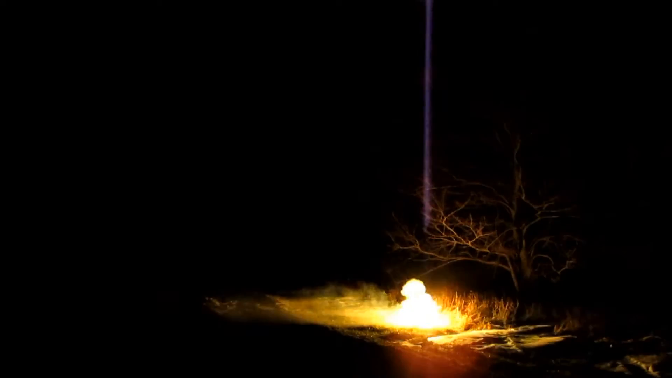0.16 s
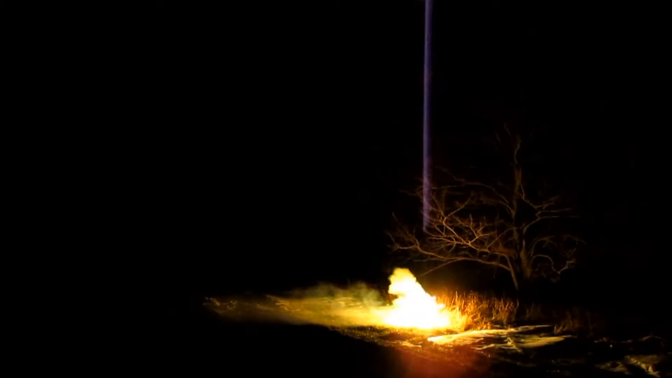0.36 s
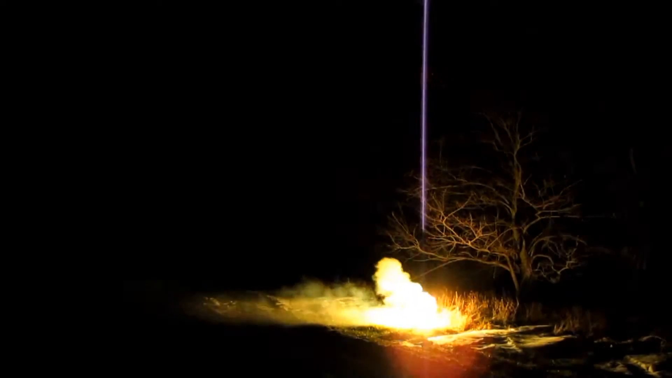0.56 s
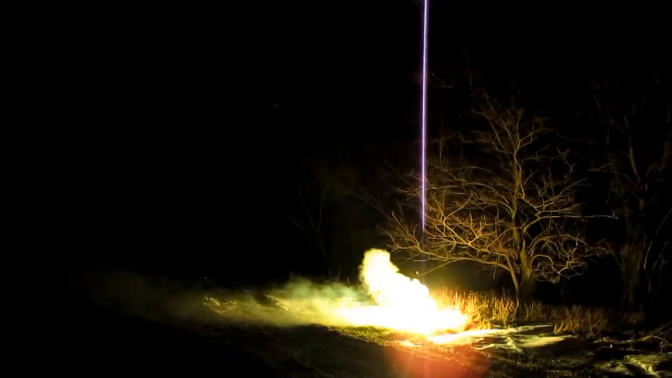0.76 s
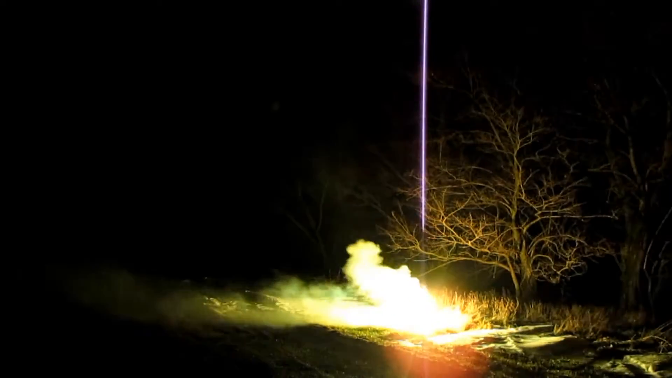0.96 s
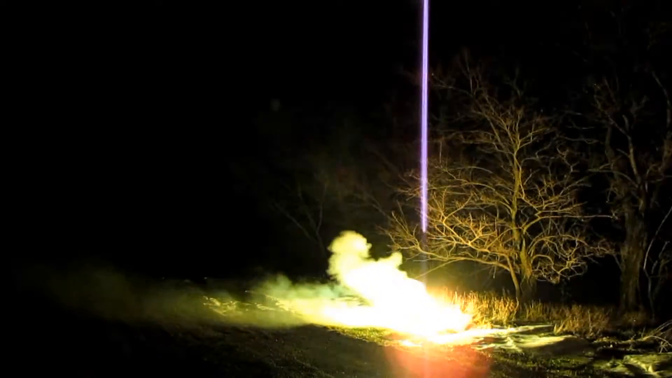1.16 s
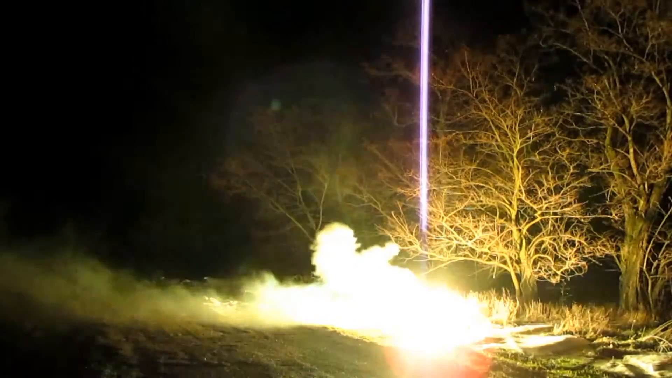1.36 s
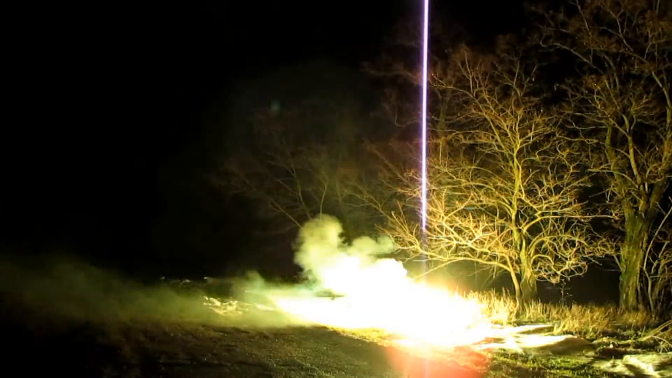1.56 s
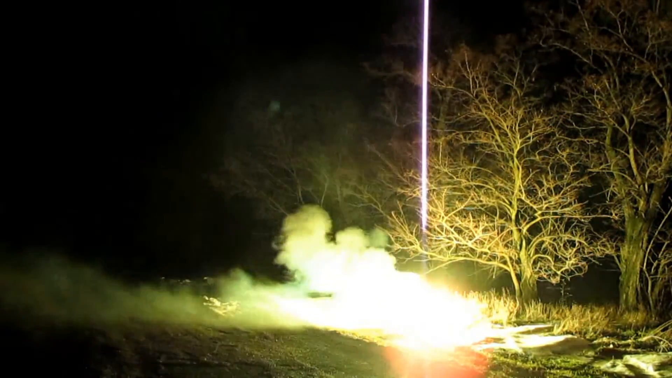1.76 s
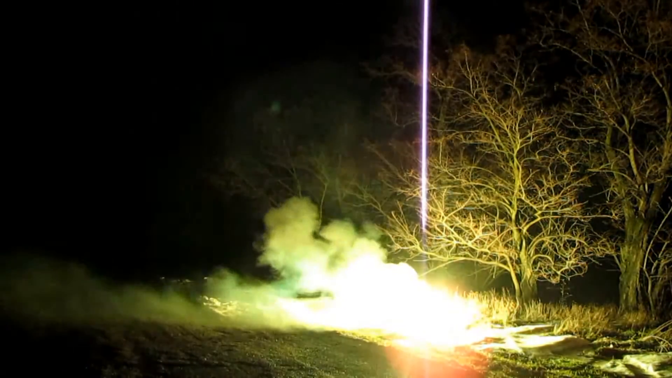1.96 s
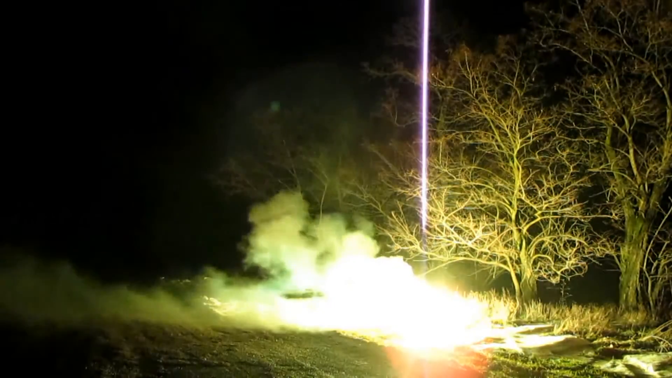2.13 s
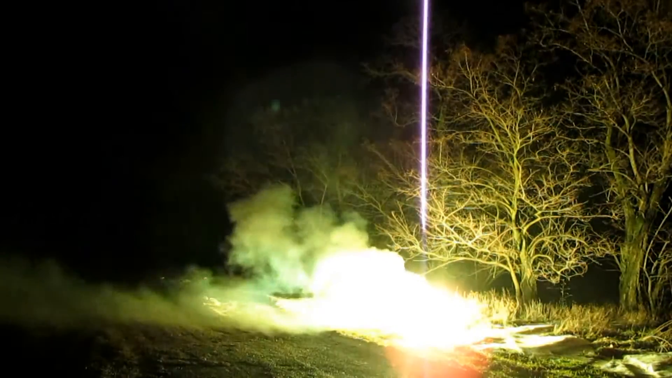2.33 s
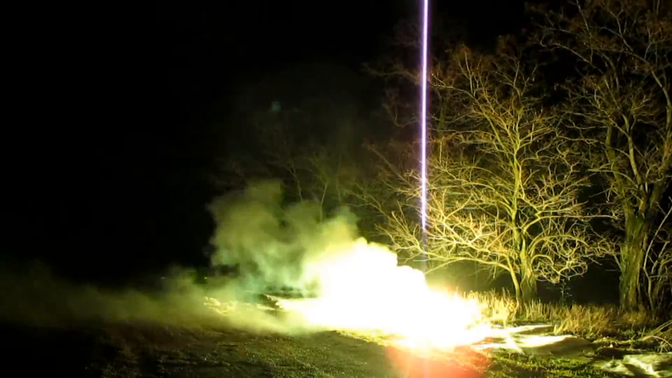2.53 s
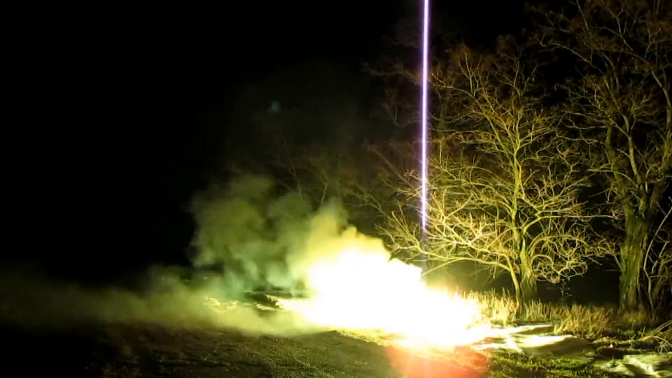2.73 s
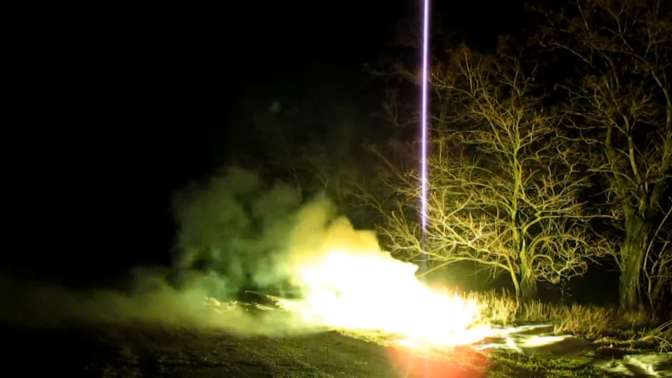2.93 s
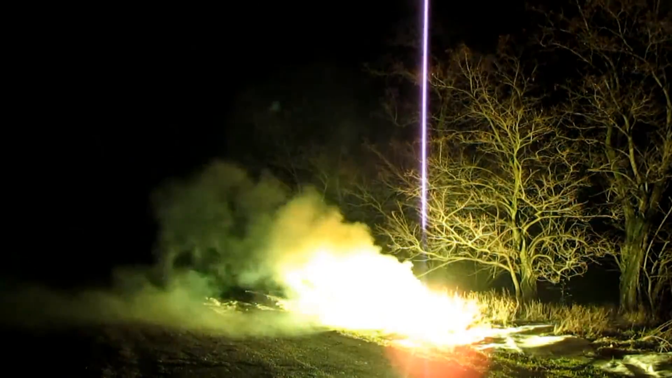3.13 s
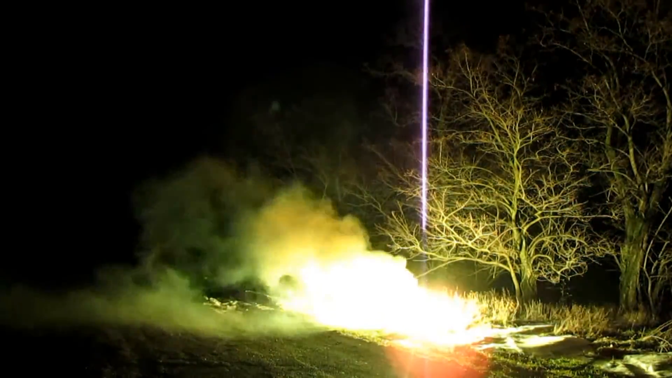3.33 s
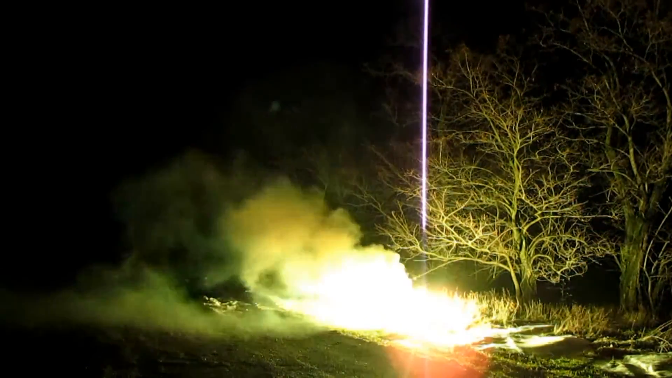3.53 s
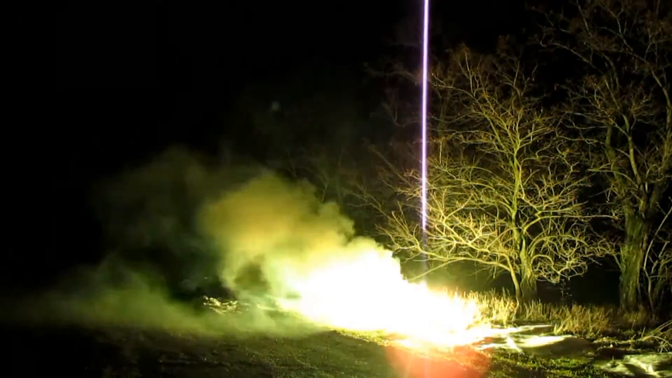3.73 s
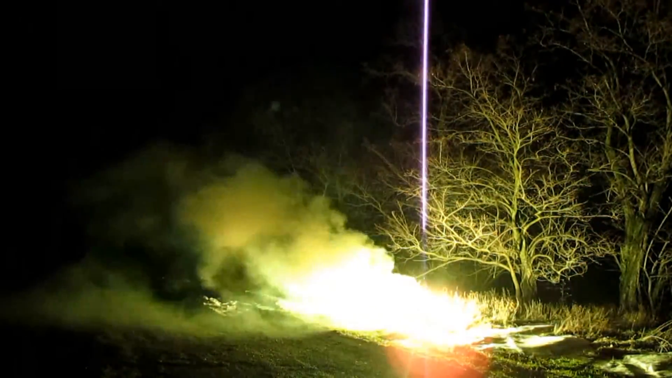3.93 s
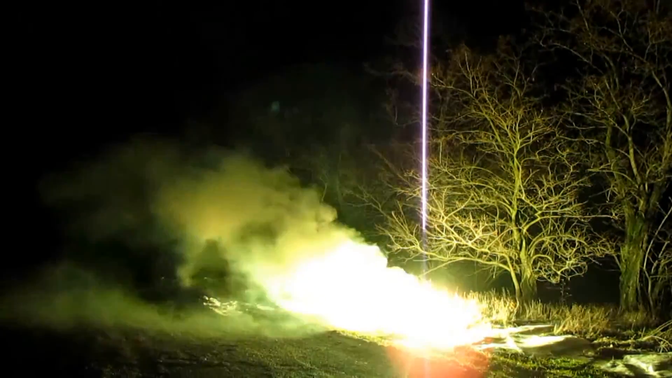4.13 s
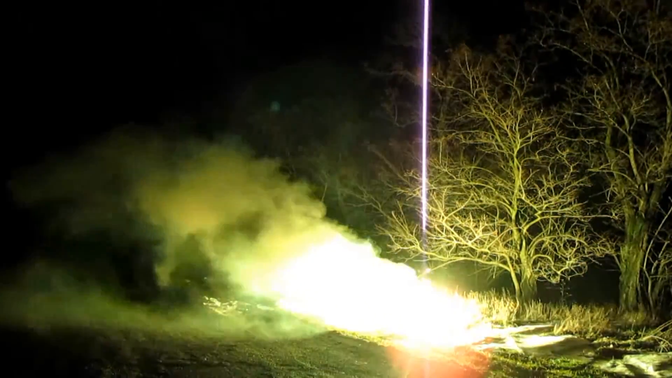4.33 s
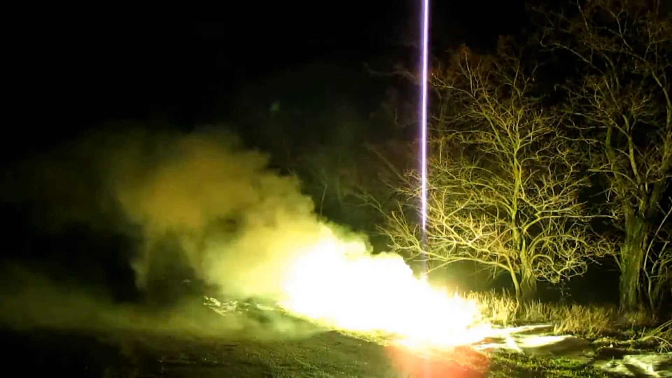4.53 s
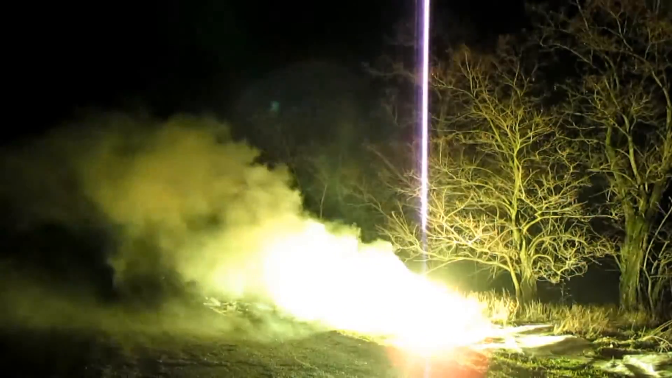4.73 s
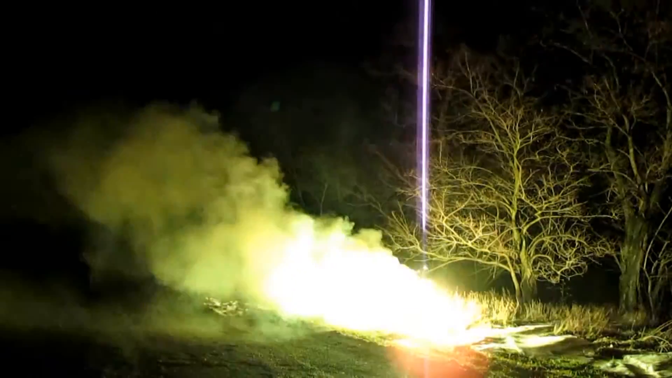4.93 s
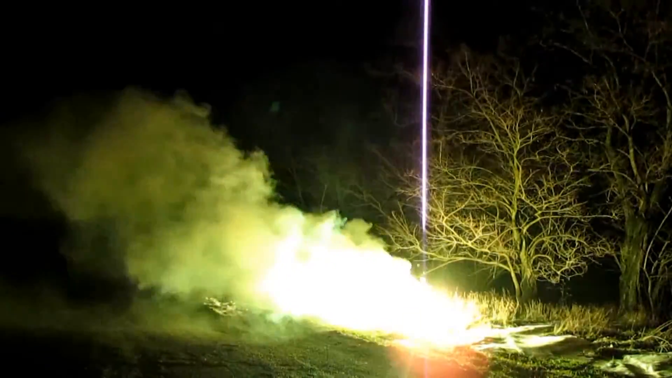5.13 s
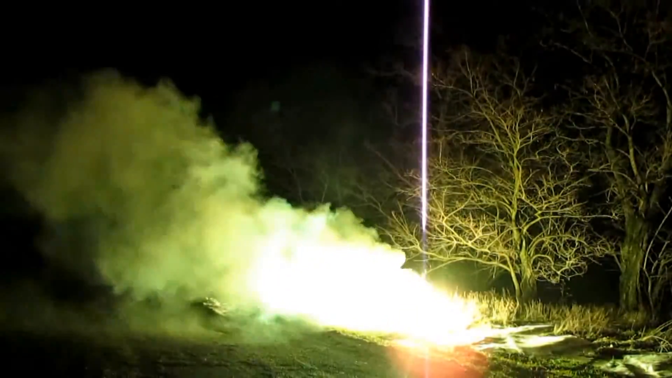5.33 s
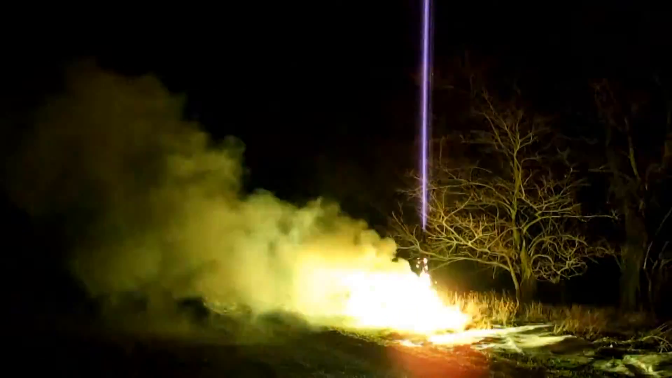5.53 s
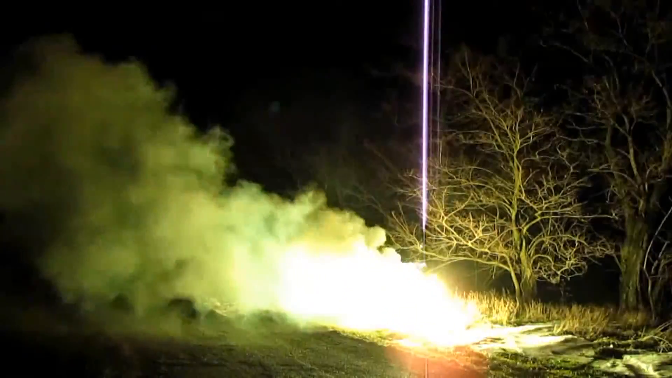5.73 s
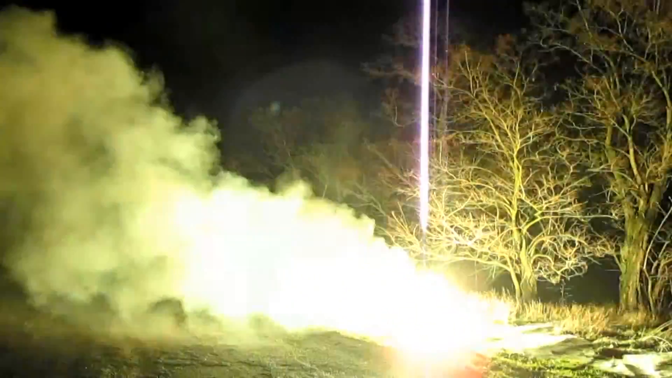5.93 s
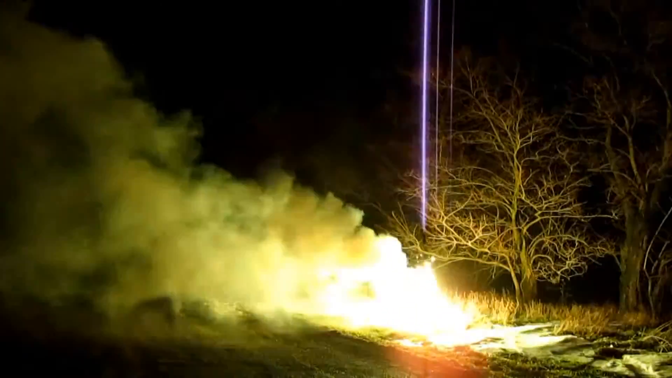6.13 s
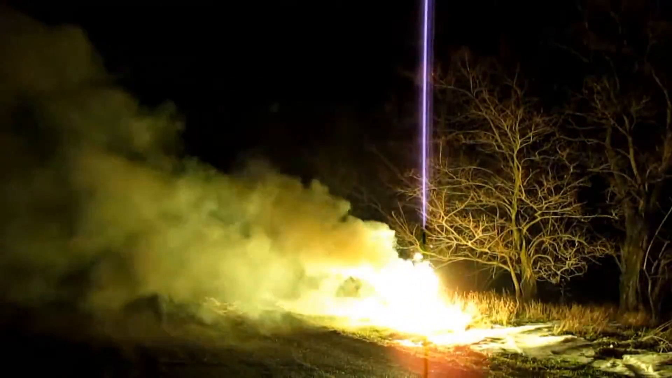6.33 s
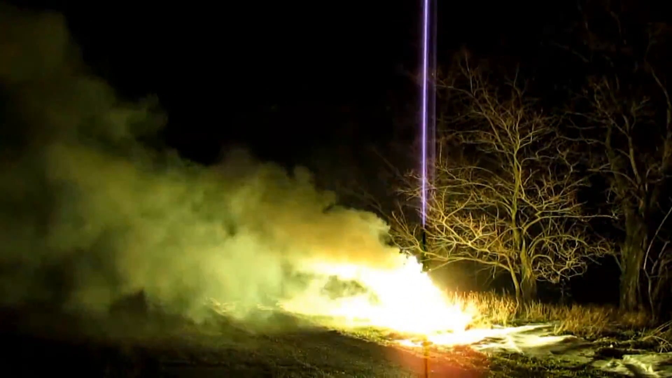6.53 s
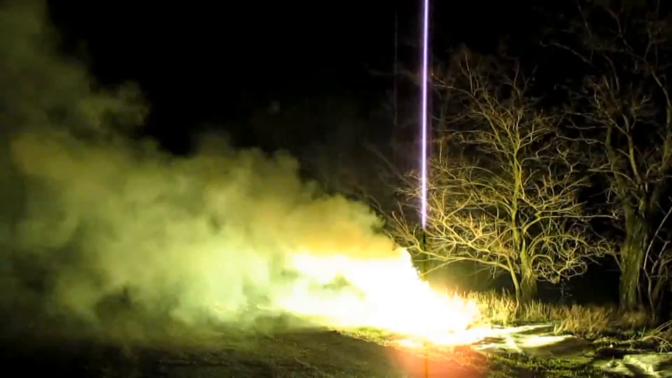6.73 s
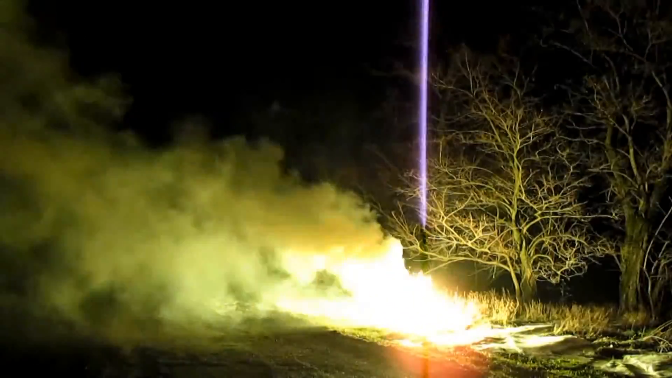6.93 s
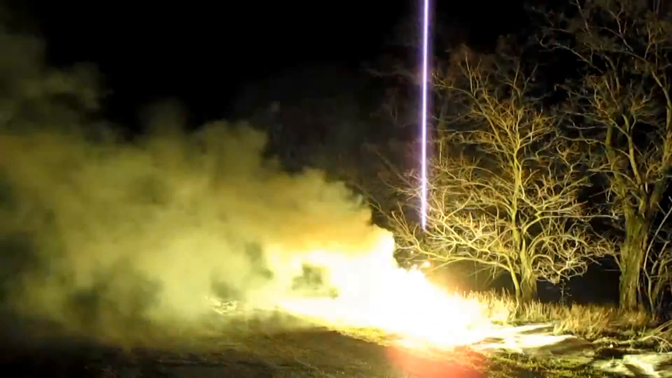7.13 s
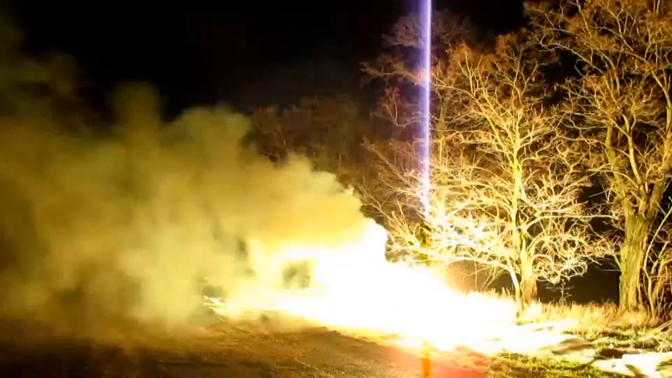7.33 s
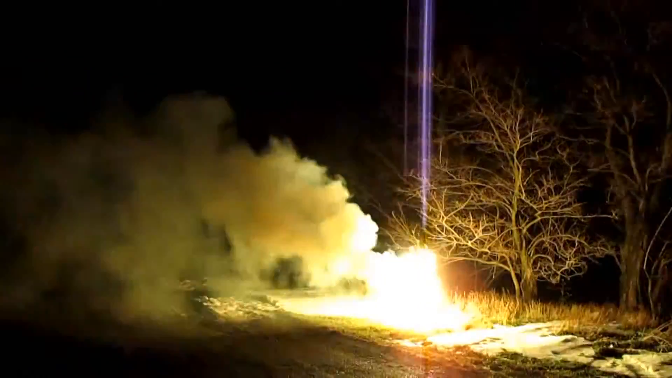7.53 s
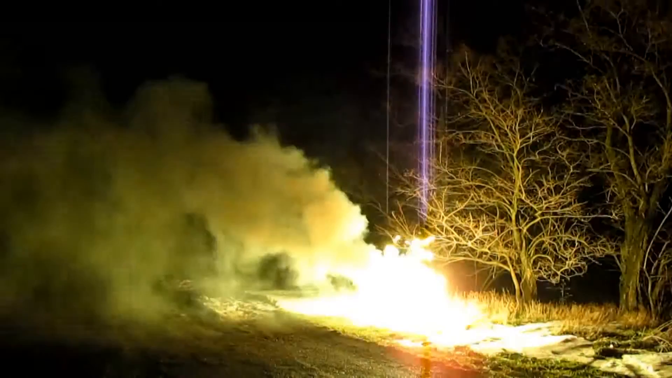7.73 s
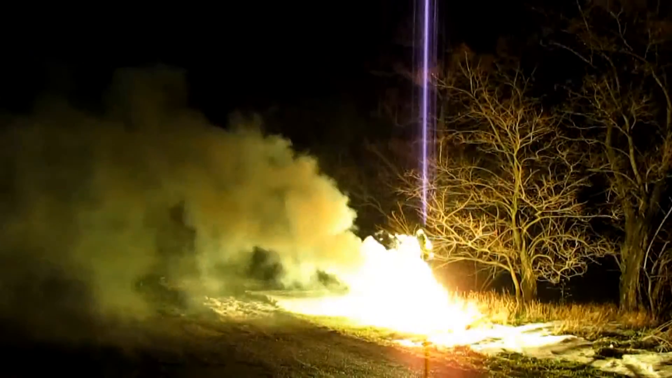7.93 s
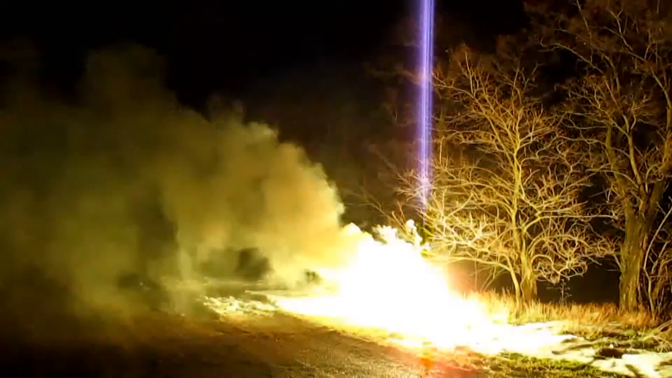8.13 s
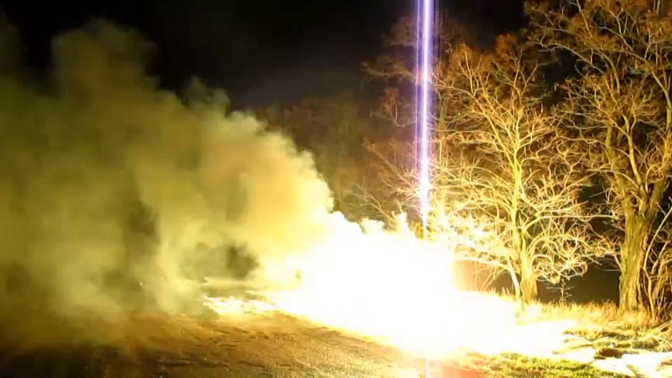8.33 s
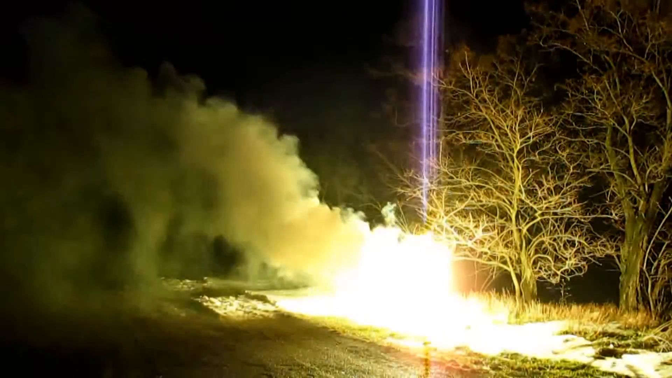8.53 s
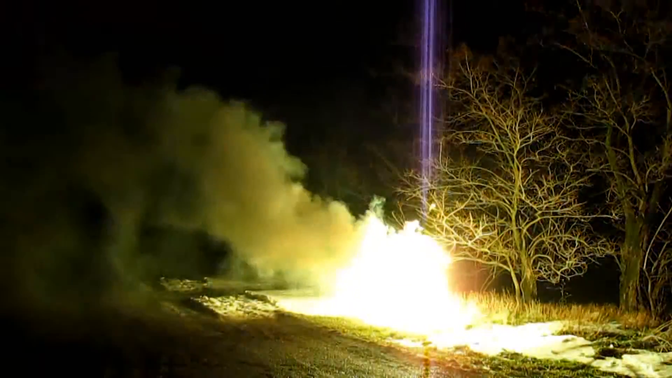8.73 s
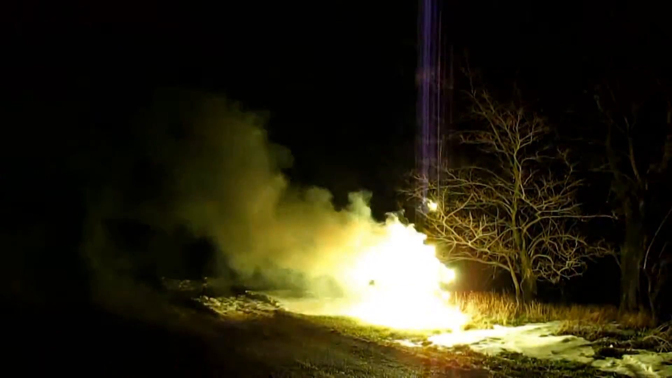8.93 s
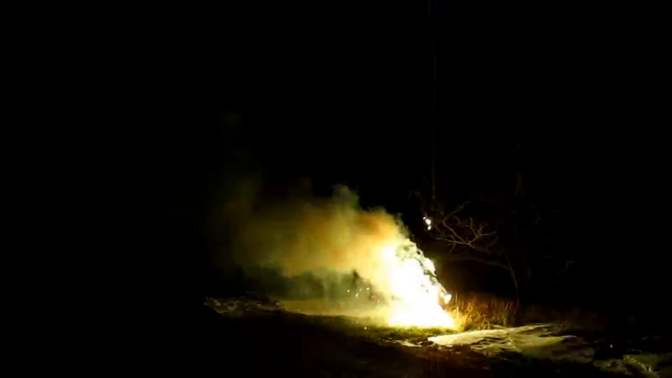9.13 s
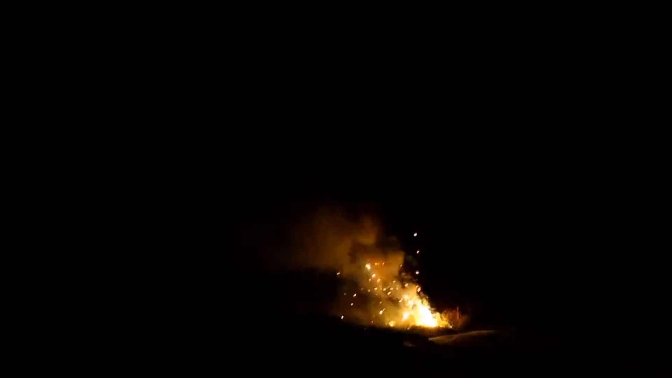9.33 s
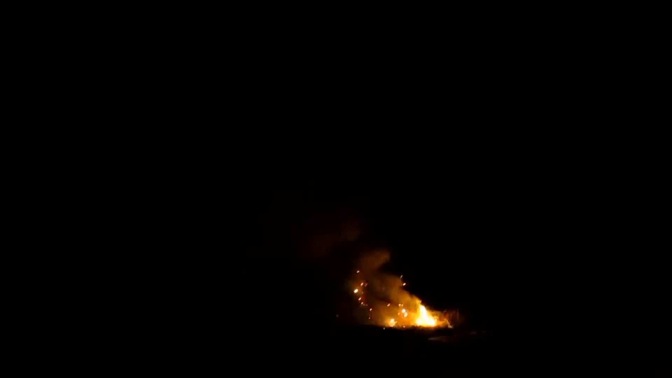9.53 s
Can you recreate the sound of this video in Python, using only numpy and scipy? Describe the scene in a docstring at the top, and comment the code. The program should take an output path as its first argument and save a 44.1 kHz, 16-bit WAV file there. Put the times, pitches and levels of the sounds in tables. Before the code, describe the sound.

A pyrotechnic flare is already burning on open ground at night, at some distance and slightly right of a stereo microphone. From 0 s a steady, airy hiss with fine dense crackle covers a soft low roar. Around 0.8-1.2 s the flame puffs and swells, and small gas spurts follow until 1.9 s. At about 2.1 s a spark snaps and the hiss brightens, easing by 3-4 s with a brief hollow colour near 3.9 s. From 4.7 s low chuffs and flame surges return, stronger at 5.5-6 s. Around 7.2-7.4 s a tight cluster of thumping puffs bursts out. Rush and sizzle keep growing, with more rough chuffs at 8.1-8.7 s, the loudest stretch. After a last flutter near 9.05 s everything falls away quickly, with little snaps at 9.2-9.5 s over a faint hush and light wind.

```python
"""Flare burning at night

A pyrotechnic flare burns on open ground, some way off and slightly to the right, until the charge burns out.
The flame roars and rumbles as bands of noise and chuffs as short ringing pushes; the gas jet above it
rushes, hisses and sizzles as brighter noise. The ground reflection cuts a dip between them that moves as
the flame grows and sinks. Random grains crackle, noise snaps make sparks, and a hush and light wind lie under it.
"""
import sys
import numpy as np
from scipy import signal
from scipy.fft import rfft, irfft, next_fast_len
from scipy.io import wavfile

SR = 44100
rng = np.random.default_rng(int(sys.argv[2]) if len(sys.argv) > 2 else 0)


def transcribe(signal):
    """Save signal, clipped to [-1, 1], as a 16-bit WAV file at the path in sys.argv[1]."""
    frames = np.atleast_2d(signal).T
    limited = np.clip(frames, -1, 1)
    pcm = np.round(limited * 32767).astype(np.int16)
    wavfile.write(sys.argv[1], SR, pcm)


N = 422125


def from_db(db):
    """Decibels to amplitude gain."""
    return 10 ** (np.asarray(db) / 20)


def in_time(rows):
    """Draws each column of a table as an automation curve, one value a sample."""
    times, *columns = np.transpose(rows)
    return [np.interp(np.arange(N) / SR, times, column) for column in columns]


def at_hz(points, hz):
    """Reads a frequency table on a log-frequency axis."""
    table_hz, values = np.array(points).T
    return np.interp(np.log(hz), np.log(table_hz), values)


def bell(hz, centre_hz, octaves):
    """A Gaussian EQ bell on a log-frequency axis, top 1."""
    return np.exp(-0.5 * (np.log2(hz / centre_hz) / octaves) ** 2)


def band_pass(order, low_hz, high_hz, x):
    """Butterworth band-pass: keeps what lies between two frequencies."""
    return signal.sosfilt(signal.butter(order, [low_hz, high_hz], "band", fs=SR, output="sos"), x)


def drift(rate_hz):
    """Slow chance: noise twice through a one-pole low-pass, spread 1."""
    step = 40  # samples between drawn values
    r = np.exp(-2 * np.pi * rate_hz * step / SR)
    noise = rng.standard_normal(N // step + 2002)
    slow = signal.lfilter([1], [1, -2 * r, r * r], noise)[2000:]  # drop the filter's start-up
    return np.interp(np.arange(N) / step, np.arange(len(slow)), slow / slow.std())


def swells(tops, db, rise_s, fall_s):
    """Straight dB ramps up to each top and down again; the highest counts, never below 0 dB."""
    t, out = np.arange(N) / SR, np.zeros(N)
    for s, top, rise, fall in np.broadcast(tops, db, rise_s, fall_s):
        near = slice(int((s - rise) * SR), int((s + fall) * SR))
        ramp = np.interp(t[near], [s - rise, s, s + fall], [0, top, 0])
        out[near] = np.maximum(out[near], ramp)
    return out


# slow course of the flame: (time [s], roar level [dB], rumble level [dB])
FLAME_COURSE = [(0.0, -46, -55), (0.58, -44.5, -52.5), (0.72, -42.5, -51), (0.95, -43, -51),
                (1.24, -40.5, -48), (1.28, -46.5, -54), (2.0, -46, -49.5), (2.8, -44.5, -51.5),
                (3.8, -41, -50), (4.35, -39.5, -49), (4.9, -41.5, -48.5), (5.3, -38, -47.5),
                (5.65, -42, -50.5), (6.2, -41, -45), (6.75, -36.5, -48), (7.1, -41, -48),
                (7.55, -41.5, -47.5), (8.15, -38, -44.5), (8.76, -32.5, -44.5), (8.81, -39.5, -46),
                (9.15, -46, -52), (9.57, -53, -62)]
# the flame swells and collapses: (time of the top [s], swell [dB], rise [s])
FLAME_SWELLS = [(0.82, 0, 0.036), (0.95, 1, .04), (2.92, 1.5, 0.045), (4.35, 3, .04), (4.77, 4.5, 0.033),
                (5.04, 4.5, 0.074), (5.17, 2.5, 0.044), (5.3, 2.5, .03), (5.44, 4, 0.07), (5.52, 4, 0.048),
                (5.84, 7, .07), (6.04, 6, 0.3), (6.34, 4, 0.045), (6.66, 2.5, 0.041), (6.82, 1.5, 0.073),
                (7.22, 7, 0.072), (7.33, 12.5, 0.03), (7.39, 7.5, 0.15), (7.7, 3.5, 0.11), (7.97, 4, .1),
                (8.07, 4, 0.025), (8.22, 3.5, 0.037), (8.29, 5, 0.071), (8.35, 0.5, .03),
                (8.42, 3.5, 0.034), (8.61, 5, 0.033), (9.06, 5, .04)]
# how high the roar reaches, before the flare-ups add to it: (time [s], tilt [dB per octave])
ROAR_REACH = [(0.0, 1), (0.6, -0.8), (1.0, 2.5), (1.24, -0.5), (1.3, 2), (3.0, -.5), (5.0, 0), (9.57, 0.2)]
COLLAPSE_S, RUMBLE_SWELLS = 0.035, 0.97  # fall after the top; share of the swell in the rumble
REACH_PER_SWELL = 0.18  # dB per octave of tilt for each dB of swell


def flame_levels():
    """Roar and rumble in dB and the roar's tilt: flare-ups make the flame louder and brighter."""
    roar_db, rumble_db = in_time(FLAME_COURSE)
    tops, db, rise = np.transpose(FLAME_SWELLS)
    up = swells(tops, db, rise, COLLAPSE_S)
    tilt_db = in_time(ROAR_REACH)[0] + REACH_PER_SWELL * up
    return roar_db + up, rumble_db + RUMBLE_SWELLS * up, tilt_db


# slow course of the gas jet: (time [s], hiss level [dB], duller rush level [dB], sizzle level [dB])
JET_COURSE = [(0.0, -40.5, -45.5, -49), (0.1, -44.5, -49, -50), (0.22, -42, -49, -52),
              (0.55, -42, -47, -53), (0.8, -40, -44, -50), (1.2, -41, -45.5, -49), (1.66, -41, -45, -49),
              (2.03, -37.5, -46, -46.5), (2.14, -34.5, -43.5, -45), (2.7, -37, -43, -48.5),
              (3.36, -39, -46.5, -49), (3.68, -41, -44, -51), (3.95, -45, -45.5, -52.5),
              (4.06, -36, -43, -49), (4.35, -39, -42.5, -46), (4.72, -34.5, -42, -41.5),
              (5.25, -37.5, -42, -46.5), (5.9, -35.5, -39, -41), (6.9, -36.5, -40.5, -43),
              (7.6, -32.5, -35.5, -37.5), (8.1, -31.5, -37.5, -36.5), (8.37, -29, -32.5, -33),
              (8.72, -28.5, -32, -33.5), (9.19, -36, -40.5, -39.5), (9.26, -39, -43.5, -44.5),
              (9.38, -45, -49.5, -50), (9.57, -48.5, -45.5, -63)]
# spurts of the jet: (time of the top [s], swell of the hiss [dB], fall [s])
JET_SPURTS = [(0.27, 4, 0.36), (1.25, 4, .1), (1.4, 4, .1), (1.44, 6, .09), (1.77, 2.0, .1),
              (1.87, 1.5, .12), (3.46, 3.5, 0.16), (4.09, 1, 0.18), (4.78, 2, 0.1), (5.03, 0, .1),
              (5.31, 1, 0.09), (5.52, 3, .05), (5.68, 2, .06), (6.05, 2, 0.044), (6.17, 2.5, 0.17),
              (6.43, 2, 0.063), (6.53, 3, 0.09), (6.82, 1, 0.054), (7.01, 1.5, .1), (7.22, 0.5, 0.061),
              (7.4, 0.5, 0.11), (7.58, 1.5, 0.13)]
# the sizzle drops out briefly: (time [s], drop [dB]); a negative drop does nothing
SIZZLE_DROPOUTS = [(1.54, -3), (2.76, 11), (3.35, 7)]
SPURT_RISE_S, RUSH_SPURTS, SIZZLE_SPURTS = 0.058, 0.57, 1.2  # rise; shares of the swell
DROPOUT_S = 0.06  # each way


def jet_levels():
    """Hiss, rush and sizzle in dB: spurts of gas ride on the slow course of the jet."""
    hiss_db, rush_db, sizzle_db = in_time(JET_COURSE)
    tops, db, fall = np.transpose(JET_SPURTS)
    up = swells(tops, db, SPURT_RISE_S, fall)
    drop = swells(*np.transpose(SIZZLE_DROPOUTS), DROPOUT_S, DROPOUT_S)
    return hiss_db + up, rush_db + RUSH_SPURTS * up, sizzle_db + SIZZLE_SPURTS * up - drop


# the two microphone ports: (frequency [Hz], likeness [0-1])
PORT_LIKENESS = [(40, .5), (80, 0.66), (130, 0.92), (200, 0.975), (400, 0.97), (800, 0.95), (1300, 0.82),
                 (3000, 0.8), (8000, .78), (15000, 0.82)]
# and their phase: (frequency [Hz], lead of the left port [rad])
PORT_LEAD = [(30, 0), (400, -.1), (700, -.3), (1100, -.5), (3600, -.75), (7000, -1.6), (10200, -2.5),
             (15500, -3.5)]


def likeness(hz):
    """Correlation of the two ports at a frequency."""
    return np.clip(at_hz(PORT_LIKENESS, hz), 0, 1)


def shares(spectrum, hz):
    """Power share of each band, scaled so that the mean of both ports carries power 1."""
    power = from_db(2 * at_hz(spectrum, hz)) * hz  # a band is as wide as its pitch is high
    summed = (1 + likeness(hz) * np.cos(at_hz(PORT_LEAD, hz))) / 2
    return power / np.sum(power * summed)


# a bright band in the hiss: (time [s], centre [Hz], lift [dB])
BRIGHT_BAND = [(0.0, 4700, 2.5), (2.3, 4830, 3.5), (3.2, 4500, 5.5), (4.0, 3900, 4.5), (4.8, 4460, 3),
               (7.5, 4600, 1), (9.57, 4580, 3)]
# a narrow hollow passes once through the hiss
HOLLOW_S, HOLLOW_HALF_S, HOLLOW_HZ, HOLLOW_DB = 3.85, 0.22, 3100, 9
TILT_ABOUT_HZ = 280
# ground reflection, moving with the height of the flame: (time [s], dip [Hz], depth [dB])
GROUND_DIP = [(0, 1380, 8.5), (1.5, 1290, 7.5), (2.5, 1220, 8.5), (3.9, 1280, 11), (4.3, 1210, 6.5),
              (7.5, 1090, 7.5), (8.5, 1020, 4), (9.1, 1010, 2.5), (9.3, 2300, -0.5), (9.42, 2460, 6),
              (9.57, 2340, 14)]
DIP_OCTAVES = 0.34
# spectra of the five noise layers, deep to bright: (frequency [Hz], level [dB per Hz])
RUMBLE_SPECTRUM = [(22, -18), (40, -5.5), (70, -6), (110, -0.5), (160, -3.5), (220, -6.5), (400, -32),
                   (1000, -60)]
ROAR_SPECTRUM = [(80, -25), (160, -4), (250, -0.5), (450, -4), (700, -8.5), (1100, -19), (2000, -22.5),
                 (4000, -40)]
RUSH_SPECTRUM = [(400, -28), (900, -6), (1500, -3), (2400, -1.5), (3100, -4), (4500, -25), (9000, -45)]
HISS_SPECTRUM = [(1000, -38), (2500, -5), (3600, 1), (5000, -1), (6800, 3), (8200, -3.5), (11000, -10.5),
                 (16000, -8)]
SIZZLE_SPECTRUM = [(3000, -40), (6000, -8), (8500, 0), (11000, -0.5), (14000, -2.5), (16000, -9)]


def flare(flutter_db, spit_db, patchy_db):
    """Turbulence noise in quarter-octave bands; roar and jet flutter apart, every band also on its own."""
    roar_db, rumble_db, tilt_db = flame_levels()
    hiss_db, rush_db, sizzle_db = jet_levels()
    bright_hz, lift_db = in_time(BRIGHT_BAND)
    dip_hz, depth_db = in_time(GROUND_DIP)
    hollow_db = HOLLOW_DB * np.exp(-((np.arange(N) / SR - HOLLOW_S) / HOLLOW_HALF_S) ** 4)

    spit = spit_db * (drift(29) + 1.5 * drift(60))
    flutter = flutter_db * (drift(27) + 0.5 * drift(3.1))
    levels_db = [rumble_db, roar_db + flutter, rush_db + 0.7 * spit, hiss_db + spit, sizzle_db + 1.3 * spit]
    powers = from_db(2 * np.array(levels_db))

    edges = 22 * 2 ** np.arange(0, 9.8, 1 / 4)
    centres = np.sqrt(edges[1:] * edges[:-1])
    spectra = (RUMBLE_SPECTRUM, ROAR_SPECTRUM, RUSH_SPECTRUM, HISS_SPECTRUM, SIZZLE_SPECTRUM)
    mix = np.transpose([shares(spectrum, centres) for spectrum in spectra])

    white, out = rng.standard_normal((2, 2, N + SR)), np.zeros((2, N))
    for k, hz in enumerate(centres):
        low_hz, high_hz = edges[k:k + 2]
        # neighbouring bands take turns on two noise pairs; the first second settles the filter
        noise = band_pass(2, low_hz, high_hz, white[k % 2])[:, SR:]
        same, apart = noise * np.sqrt(SR / 2 / (high_hz - low_hz))

        dip_db = -depth_db * bell(hz, dip_hz, DIP_OCTAVES)
        if hz < 1600:
            octaves = np.clip(np.log2(hz / TILT_ABOUT_HZ), -1, 2)
            colour_db = tilt_db * octaves * bell(hz, 480, 1.0)
        else:
            colour_db = lift_db * bell(hz, bright_hz, 0.21) - hollow_db * bell(hz, HOLLOW_HZ, 0.067)
        gain = np.sqrt(mix[k] @ powers) * from_db(dip_db + colour_db + patchy_db * drift(10.0))

        alike = likeness(hz)
        middle = np.sqrt(1 + alike) * same
        side = np.sqrt(1 - alike) * apart * [[1], [-1]]
        out += gain * (middle + side) / np.sqrt(2)
    return out


def crackle(per_s, spread_db, below_db):
    """Grains of the charge burst at random; their level follows the hiss."""
    sizes = from_db(spread_db * np.minimum(rng.exponential(1, N), 5)) * rng.choice([-1, 1], N)
    clicks = sizes * (rng.random(N) < per_s / SR)
    grains = band_pass(2, 1800, 12000, clicks)
    hiss_db = jet_levels()[0]
    return from_db(hiss_db - below_db) * grains / grains.std()


NIGHT_DB, WIND_DB = -56, -59.5  # steady levels


def night():
    """Smooth far hush and low wind noise on the ports, unrelated left and right."""
    white = rng.standard_normal((2, 2, N + SR))
    hush = band_pass(1, 500, 1400, white[0])[:, SR:]
    wind = band_pass(2, 36, 110, white[1])[:, SR:]
    return from_db(NIGHT_DB) * hush / hush.std() + from_db(WIND_DB) * wind / wind.std()


# pockets of gas flaring up: (time [s], level before lift, decay and filter [dB], pitch [Hz])
GAS_CHUFFS = [(0.829, -25, 283), (0.944, -25, 398), (1.127, -29, 161), (4.764, -23, 199), (5.304, -42, 256),
              (5.507, -18, 242), (6.019, -20, 264), (6.049, -23, 102), (6.647, -23, 291), (7.187, -28, 221),
              (7.219, -29, 301), (7.323, -23, 272), (7.329, -25, 296), (7.368, -24, 328), (7.374, -18, 300),
              (7.388, -18, 137), (8.063, -19, 133), (8.215, -16, 250), (8.251, -24, 258), (8.276, -28, 186),
              (8.397, -23, 258), (8.411, -19, 188), (8.603, -25, 304), (8.651, -23, 275)]


def chuffs(cycles, lift_db):
    """Each chuff is one push of gas: a sine that rings a cycle or two."""
    out, t = np.zeros(N), np.arange(SR // 20) / SR
    for s, level_db, hz in GAS_CHUFFS:
        start = round(s * SR)
        ring = np.sin(2 * np.pi * hz * t) * np.exp(-hz * t / cycles)
        out[start:start + len(t)] += from_db(level_db + lift_db) * ring
    return band_pass(2, 80, 1100, out)


# sparks snapping: (time [s], level before lift and filter [dB])
SPARK_SNAPS = [(2.1044, -23), (9.2144, -24), (9.2794, -28), (9.3014, -29), (9.4724, -25)]


def sparks(lift_db):
    """Each spark is a snap of noise a millisecond or two long."""
    out, t = np.zeros(N), np.arange(SR // 100) / SR
    noises = rng.standard_normal((len(SPARK_SNAPS), len(t)))
    for (s, level_db), noise in zip(SPARK_SNAPS, noises):
        start = round(s * SR)
        out[start:start + len(t)] += from_db(level_db + lift_db) * noise * np.exp(-t / 0.0008)
    return band_pass(2, 3200, 10000, out)


# balance of the two ports: (frequency [Hz], left minus right [dB])
PORT_BALANCE = [(60, -.8), (150, 0.2), (380, .7), (950, 0.2), (2380, -1.9), (5980, -1.2), (15000, -3)]


def ports(x):
    """The sound reaches the right port first and, in the treble, a little louder."""
    size = next_fast_len(N)
    hz = np.maximum(np.arange(size // 2 + 1) * SR / size, 1)
    # each port takes half of the level and phase difference
    half = from_db(at_hz(PORT_BALANCE, hz) / 2) * np.exp(0.5j * at_hz(PORT_LEAD, hz))
    return irfft(rfft(x, size) * [half, 1 / half], size)[:, :N]


def scene():
    """The flare as the two ports hear it, over the quiet night."""
    bursts = chuffs(cycles=1.02, lift_db=-2.0) + sparks(lift_db=1.0)
    bursts += crackle(per_s=600, spread_db=7.0, below_db=13.5)
    burning = flare(flutter_db=0.62, spit_db=0.3, patchy_db=0.93)
    return ports(burning + bursts) + night()


NOTCH_HZ, NOTCH_WIDTH_HZ, NOTCH_DB = 7865, 150, -12
CUTOFF_HZ = 15740


def record(dry):
    """A narrow notch in the treble, then a steep low-pass cuts the top."""
    w, a = 2 * np.pi * NOTCH_HZ / SR, np.pi * NOTCH_WIDTH_HZ / SR
    g = from_db(NOTCH_DB)
    notched = signal.lfilter([1 + a * g, -2 * np.cos(w), 1 - a * g], [1 + a, -2 * np.cos(w), 1 - a], dry)
    return signal.sosfilt(signal.ellip(16, 0.5, 100, CUTOFF_HZ, fs=SR, output="sos"), notched)


dry = scene()
out = record(dry)
transcribe(out)
```